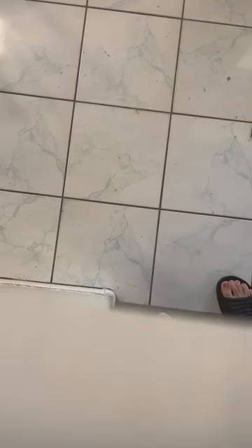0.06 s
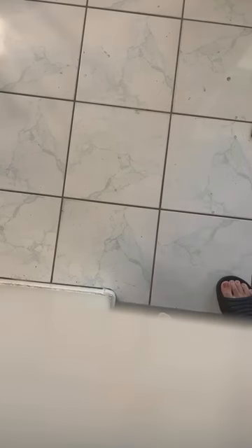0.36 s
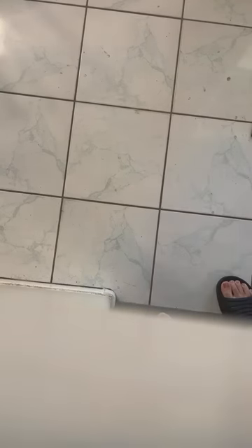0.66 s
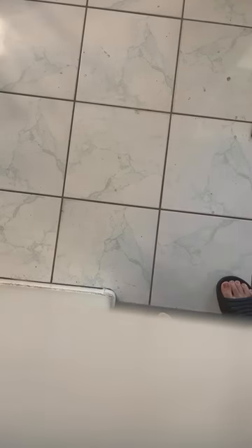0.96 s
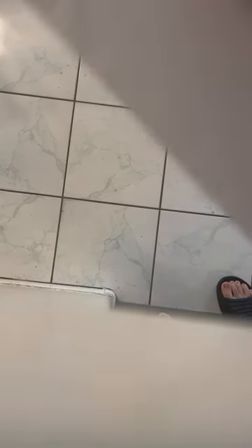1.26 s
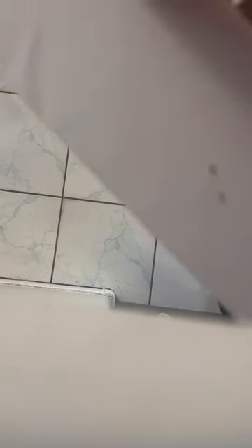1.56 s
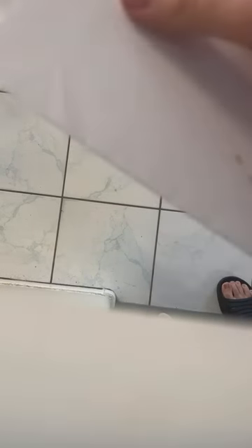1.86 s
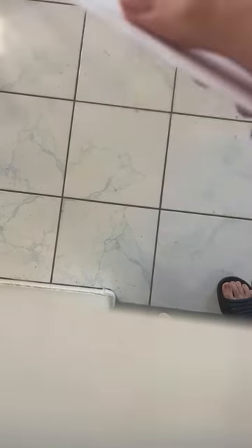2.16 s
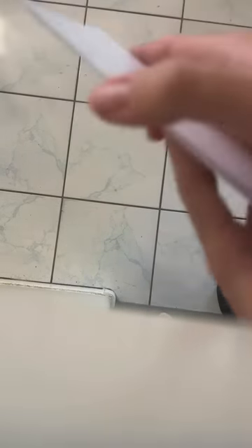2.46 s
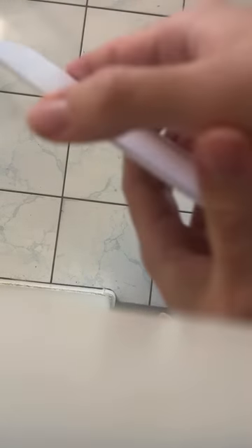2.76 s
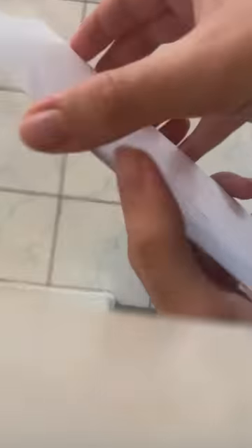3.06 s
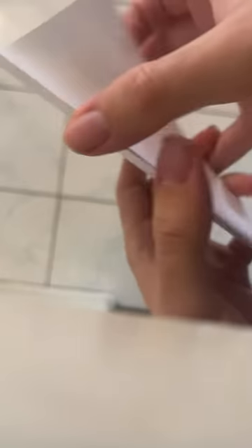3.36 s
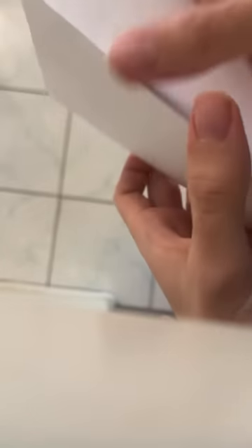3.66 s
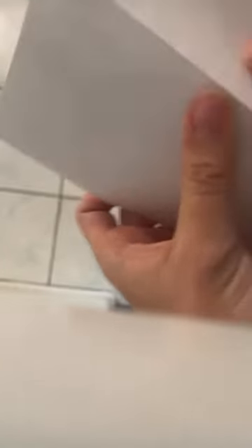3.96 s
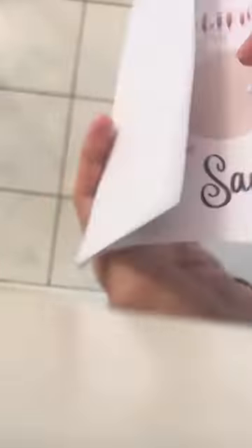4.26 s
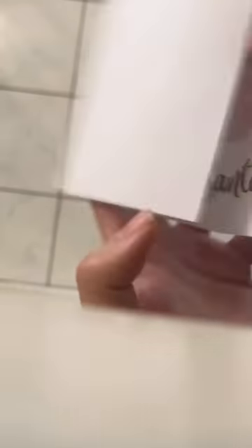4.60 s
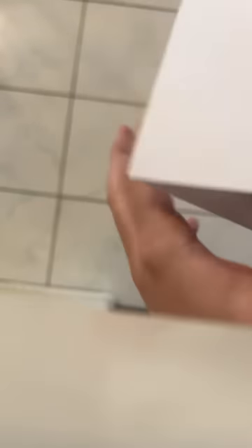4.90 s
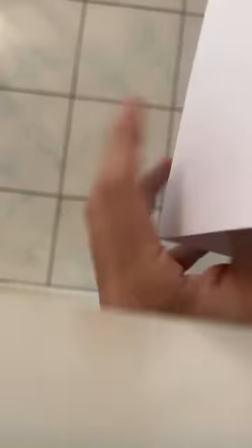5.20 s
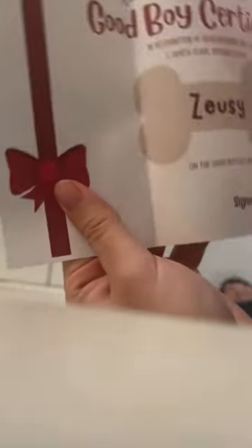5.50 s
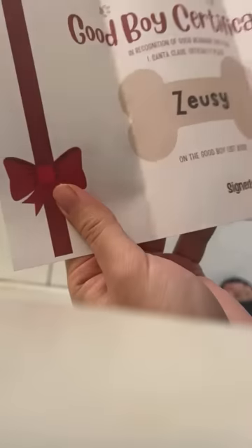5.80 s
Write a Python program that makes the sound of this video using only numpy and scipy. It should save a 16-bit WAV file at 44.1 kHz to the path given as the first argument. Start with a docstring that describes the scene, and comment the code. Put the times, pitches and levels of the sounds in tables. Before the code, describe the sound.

Hands slide a stiff sheet from a paper envelope and unfold it, with close rustles, snaps and flaps in a quiet room.

```python
"""A paper envelope is opened close up; hands slide a stiff folded sheet out and unfold it.
Fibres catch and let go as paper rubs on paper, giving a grainy hiss; an edge sticks and slips in a
faint, high squeak. Creases buckle in quick bursts of jolts, heard as snaps and flaps. Near the end one
flap knocks something hard that rings on briefly. The quiet tiled room adds a short tail and a low hum."""
import sys
import numpy as np
from scipy import signal
from scipy.fft import rfft, irfft
from scipy.io import wavfile
from scipy.ndimage import uniform_filter1d

SR = 44100
rng = np.random.default_rng(int(sys.argv[2]) if len(sys.argv) > 2 else 0)


def materialize(psi):
    """Save the field psi as 16-bit PCM at rate SR to the path in sys.argv[1].

    A 1-D psi becomes a single channel; in a 2-D psi each row is a channel.
    """
    bounded = np.clip(np.atleast_2d(psi).T, -1, 1)
    quanta = np.round(bounded * 32767).astype(np.int16)
    wavfile.write(sys.argv[1], SR, quanta)


N = 257533
TIME = np.arange(N) / SR

# a hand draws paper over paper: (time [s], length [s], level [dB], swell [dB], bass weight [dB],
# brightness [dB], note of the air pocket [Hz])
HAND_STROKES = [(0.0, 0.12, -27.5, -10.5, -7, -11.5, 1220), (0.133, 0.053, -38, 5.5, -11, -8.5, 1200),
                (0.237, 0.16, -38, -11.5, 1, -7, 1280), (0.546, 0.34, -57.5, -3.5, -1.5, 3.5, 1010),
                (0.954, 0.063, -52.5, -4, 12.5, 5.5, 1050), (1.034, 0.088, -46, -1.5, 4, 8, 1310),
                (1.16, .24, -45.5, -9, -4, 3, 1380), (1.45, 0.11, -57.5, 9.5, -11, -2.5, 1350),
                (1.704, 0.052, -56, -4.5, 10, 6, 1270), (1.825, 0.4, -75.5, -1, 15, 3, 1530),
                (2.15, 0.17, -66, 0, 0.5, 4, 1750), (2.454, 0.14, -57.5, 4, -7, -11.5, 1490),
                (2.724, 0.027, -55.5, 3.5, -8, -9.5, 1540), (2.79, 0.081, -58.5, 4.5, -2, -16.5, 1470),
                (2.978, 0.056, -55, -5.5, 6, -12.5, 1440), (3.163, 0.071, -65, 2, -11, -12, 1900),
                (3.33, 0.18, -58, 8.5, 3.5, -10.5, 1670), (3.508, 0.26, -51.5, -4, -9, -8, 1120),
                (3.706, 0.047, -35.5, 1, -23, -18.5, 1170), (3.943, 0.15, -40.5, -8.5, -2.5, -12.5, 1430),
                (4.154, .04, -39, -4, -2, -5, 1380), (4.282, .1, -52.5, 8, 9.5, -8.5, 1300),
                (4.504, 0.14, -47, 7.5, 3, -15, 1070), (4.7, 0.077, -35.5, -5, -1, -19, 1070),
                (4.85, 0.31, -54, -5, 5, -12.5, 960), (5.067, 0.15, -50.5, 0, -7, -11, 1180),
                (5.285, 0.026, -44.5, 3, -2, -12.5, 1110), (5.393, 0.09, -27.5, -15.5, 2, -25, 1100),
                (5.55, 0.19, -52.5, 4, -8, -13, 1240), (5.781, 0.021, -43.5, 2, -9, -18, 1240)]
# layers of the rub, named flutter, body, scrape and fibre hiss: (low edge [Hz], high edge [Hz])
RUB_BANDS = [(60, 500), (500, 2100), (2100, 7500), (7500, 16000)]
# mix of each rub layer: (offset [dB], share of bass weight [ratio], share of brightness [ratio])
RUB_MIX = [(-1, 1, 0.017), (0, 0.14, 0.066), (-1.5, 0, 0.53), (0, 0.079, 0.96)]
# sliding paper as coloured by the microphone, before each layer is levelled: (frequency [Hz], level [dB])
RUB_AT_MIC = [(50, 0.5), (150, 6.5), (300, 1.5), (700, -1), (1500, -2.5), (2400, -5), (3800, -4.5),
              (6000, -8.5), (7700, -20), (8600, -17.5), (9800, -17), (10900, -23.5), (13500, -19),
              (16000, -24)]
# faint rub of paper that is merely held, one value a rub layer: (level [dB])
HELD_RUB_DB = (-60, -71.5, -74, -87)
# a light touch lets the paper ring high and freely, a firm one lowers and damps it:
# (rub level [dB], note of the rubbed edge [Hz], ring [dB])
TOUCH_TONE = [(-72, 5400, 9), (-52, 4770, 6.5), (-47, 3480, 5.5), (-31.5, 2660, 5.5)]
# the sheet is held tight as it is drawn along, and again as it comes free:
# (time [s], narrow hiss against the fibre hiss [dB])
PINCH_CURVE = [(0, -14), (1.0, -12), (1.04, 3.5), (1.3, 3.5), (1.46, -2), (1.7, -14), (4.05, -15),
               (4.18, 1), (4.32, -19)]
# the paper buckles: (time [s], decay [s], panel note [Hz], crease note [Hz], level [dB],
# bass weight [dB], brightness [dB])
BUCKLES = [(0.001, 0.014, 106, 4500, -33.5, 4, -3), (0.0353, 0.0012, 1320, 8800, -31, -14, -10.5),
           (0.187, 0.008, 1280, 2660, -31, -10, -12), (0.196, .013, 900, 2720, -26, -9, -14.5),
           (0.211, 0.0071, 920, 2520, -23, -11, -25), (0.231, 0.0092, 586, 2900, -28.5, -10, -32),
           (0.284, .005, 1590, 3100, -36.5, -15, -23), (0.6234, 0.0082, 950, 5960, -52.5, 0, 1),
           (0.949, 0.0086, 1100, 4500, -53.5, -7, -2), (0.9771, 0.0043, 1080, 2450, -25, -25, -12),
           (1.0308, 0.0049, 1380, 5900, -30.5, -22, -5), (1.068, 0.0082, 250, 5000, -43.5, 4, -17),
           (1.5453, 0.011, 1440, 4470, -50, -12, 0.5), (1.587, 0.006, 446, 2670, -35, -9, -13.5),
           (2.9, 0.01, 1460, 5000, -49, -22, -15), (3.014, 0.0088, 1500, 6900, -63, -11, 2),
           (3.3488, 0.004, 1460, 5800, -52.5, 5, -21), (3.399, 0.0054, 2070, 2770, -45, -20, -12),
           (3.4581, 0.0038, 1080, 4260, -29, -51, -8), (3.458, 0.0054, 100, 4300, -65, 30.5, -3),
           (3.506, .0028, 1100, 4500, -46, -13, -8.5), (3.646, 0.0038, 930, 5300, -44.5, 0, -20),
           (3.6842, 0.0027, 1170, 5240, -20, -10.5, -8), (3.6886, 0.0088, 1840, 2760, -17.5, -11.5, -20.5),
           (3.7643, 0.0072, 270, 2820, -36, 0, -6), (3.8046, 0.011, 252, 4800, -38, 4, -5.5),
           (3.822, 0.021, 120, 4770, -33, -1.5, -9.5), (3.917, .002, 1400, 5200, -50, 0, -1),
           (3.937, .012, 272, 2500, -37, 6, -21), (4.0239, 0.012, 141, 3040, -36.5, 13.5, -38),
           (4.132, 0.0021, 1690, 2780, -16, -32, -25.5), (4.321, 0.0196, 131, 3000, -53.5, 17, -13),
           (4.3463, 0.0023, 1200, 5600, -29.5, -6, -9.5), (4.423, 0.015, 156, 2500, -37, 13, -14),
           (4.446, 0.0019, 1580, 2820, -36, 6, -15), (4.4516, 0.0074, 410, 3060, -17.5, -12, -46),
           (4.578, 0.017, 1050, 2800, -28.5, -1.5, -19.5), (4.611, 0.014, 1730, 3480, -30, -10, -9.5),
           (4.676, 0.0075, 300, 2720, -36.5, -1, -14), (4.682, 0.0093, 1020, 2780, -24, -0.5, -12),
           (4.7026, 0.01, 276, 2380, -28.5, -2, -15), (4.943, .0032, 213, 2800, -50, -1, -9),
           (4.98, 0.014, 148, 2780, -45, 18, -43), (5.1404, 0.009, 216, 4770, -45.5, 4, -7.5),
           (5.284, 0.017, 884, 8800, -47, -1, -21), (5.322, 0.016, 125, 3200, -52, 18.5, -10),
           (5.3664, 0.0056, 1080, 2630, -23.5, -17, -31), (5.3703, 0.011, 1040, 2700, -20, -12, -31.5),
           (5.4257, 0.0061, 840, 3000, -35.5, -3, -13.5), (5.658, 0.032, 180, 5640, -48, 5, -11.5),
           (5.806, 0.0071, 920, 2560, -24.5, -5, -30), (5.8136, 0.0016, 960, 2320, -15.5, -13, -32),
           (5.8166, 0.014, 330, 2530, -19.5, -4, -26)]
# layers of a snap, named thump, flap, pop, crack, snap and tick: (low edge [Hz], high edge [Hz])
SNAP_LAYERS = [(60, 250), (250, 800), (800, 2150), (2150, 3700), (3700, 7000), (7000, 16000)]
# mix of each snap layer: (offset [dB], share of bass weight [ratio], share of brightness [ratio],
# lift with the panel note [dB/octave], lift with the crease note [dB/octave])
SNAP_MIX = [(-1, 1, 0.055, 0, 0), (1.5, .3, 0, -0.95, -0.5), (0.5, 0.011, 0.027, 0, 0.5),
            (-5, 0.018, 0.38, 0, -2.5), (-0.5, 0, 0.91, 0.5, 1), (-0.5, 0.054, 1.37, 1, -1.5)]
# a snap as coloured by the microphone, before each layer is levelled: (frequency [Hz], level [dB])
SNAP_AT_MIC = [(50, -6), (110, 5.5), (400, -5.5), (700, -3.5), (1150, 3), (2000, -4), (2350, -11.5),
               (3600, -14.5), (5300, -18.5), (7300, -24), (9300, -23), (11000, -31), (15500, -35.5)]
# standing resonances of envelope and sheet: (frequency [Hz], sharpness [Q], lift [dB])
PAPER_RESONANCES = [(286.5, 7.9, 2), (1710, 10.4, 1.5), (2130, 72, -1), (3150, 52, 1.5), (4360, 47, -1.5),
                    (5165, 22, 0.5), (8420, 41, 3), (9600, 23, 0.5)]
# tail of the tiled room: (low edge [Hz], high edge [Hz], time to fall 60 dB [s], level [dB])
REVERB_BANDS = [(132, 217, 0.97, -15.5), (202, 540, 0.31, -35), (600, 1600, 1, -17),
                (2620, 5900, 0.67, -11), (7140, 16000, 0.49, -16.5)]
# colour of the room tone: (frequency [Hz], level [dB])
HUM_COLOUR = [(30, -25.5), (55, -17.5), (80, 1.5), (115, -9), (190, 4.5), (290, -9), (390, -8.5),
              (650, -21), (1000, -21), (1600, -30.5), (2700, -36.5), (5500, -38.5), (11000, -46),
              (16000, -64)]
# two spots of a paper edge squeak: (time [s], upper pitch [Hz], lower pitch [Hz])
SQUEAK_PITCHES = [(3.345, 12000, 11600), (3.385, 14100, 13500), (3.43, 15150, 14650), (3.495, 14100, 13600),
                  (3.545, 13700, 13000), (3.643, 14700, 12850), (3.69, 14300, 12550)]
# modes of the hard thing that is knocked: (frequency [Hz], level [dB], time to fall 60 dB [s])
KNOCK_RING = [(197, -32, 0.25), (375, -24.5, 0.11), (863, -15.5, 0.15), (858, -39.5, 0.75),
              (910, -51, 0.38), (958, -62, .45), (1070, -50, 0.22), (1523, -41, .35)]

STROKE_RISE_S, STROKE_RISE_SHARE, STROKE_RELEASE_DB_PER_S = 0.014, 0.27, 230
GRIP_CHANGE_S, PINCH_LOW_HZ, PINCH_HIGH_HZ = 0.064, 8250, 9870
MID_PANEL_HZ, MID_CREASE_HZ = 800, 3300
# the sheet rubs as it settles: offsets from its snap, and shares of the snap's colour that it keeps
SETTLE_DB, SETTLE_WEIGHT_DB, SETTLE_BRIGHT_DB = -15, 2.5, -8
SETTLE_KEEPS_WEIGHT, SETTLE_KEEPS_BRIGHT = 0.24, 0.73
SETTLE_RISE_S, SETTLE_DB_PER_S = 0.0092, 110
BEND_DB, BEND_DB_PER_S = -2.5, 900   # the same rub swells just before the sheet gives way


def from_db(db):
    return 10 ** (np.asarray(db) / 20)


def rms_one(x):
    return x / np.sqrt(np.mean(x ** 2) + 1e-20)


def in_time(rows):
    """One curve for each column after the time."""
    times, *columns = np.transpose(rows)
    return [np.interp(TIME, times, column) for column in columns]


def band(x, low, high, order=3):
    sos = signal.butter(order, [low, min(high, .45 * SR)], "band", fs=SR, output="sos")
    return signal.sosfilt(sos, x + 1e-18)


def drift(turns_per_s):
    """Random wander with an RMS of 1."""
    knots = rng.standard_normal(int(N / SR * turns_per_s) + 2)
    return rms_one(np.interp(TIME * turns_per_s, np.arange(len(knots)), knots))


def response(colour, size=4096):
    """Minimum-phase impulse response with the given colour."""
    hz, db = np.transpose(colour)
    grid = np.maximum(np.arange(size // 2 + 1) * SR / size, 1)
    gain = from_db(np.interp(np.log(grid), np.log(hz), db))
    cepstrum = irfft(np.log(gain))
    fold = np.r_[1, np.full(size // 2 - 1, 2), 1, np.zeros(size // 2 - 1)]
    return irfft(np.exp(rfft(cepstrum * fold)))


def through(x, impulse):
    return signal.fftconvolve(x, impulse)[:len(x)]


def add(track, start_s, sound):
    start = int(np.clip(round(start_s * SR), 0, N - 1))
    track[start:start + len(sound)] += sound[:N - start]


def resonate(x, hz, q, boost_db):
    """Bell EQ: lifts or dips a band around hz."""
    b, a = signal.iirpeak(hz, q, fs=SR)
    return x + (from_db(boost_db) - 1) * signal.lfilter(b, a, x)


def glide(x, hz, q, boost_db, block=256):
    """Bell EQ with a moving centre."""
    peak, state = np.zeros(N), np.zeros(2)
    for i in range(0, N, block):
        b, a = signal.iirpeak(hz[i], q, fs=SR)
        peak[i:i + block], state = signal.lfilter(b, a, x[i:i + block], zi=state)
    return x + (from_db(boost_db) - 1) * peak


def envelope(start, rise, hold, swell_db, release_db_per_s, time):
    """Rises, swells or sags while it is held, then dies away."""
    age = time - start
    held_db = swell_db * np.clip(age / hold, 0, 1)
    release_db = release_db_per_s * np.maximum(age - hold, 0)
    return np.clip(age / rise, 0, 1) * from_db(held_db - release_db)


def layer_levels(mix, db, *traits):
    """Level of each layer in dB: weight lifts the lows, brightness the highs."""
    return db + np.array(mix) @ [1, *traits]


def rub_gains(step=64):
    """Friction strength per layer: the held sheet, the strokes, bending and settling around each snap."""
    time = TIME[::step]
    power = from_db(HELD_RUB_DB)[:, None] ** 2
    for start, length, db, swell_db, weight_db, bright_db, _ in HAND_STROKES:
        rise = STROKE_RISE_S + STROKE_RISE_SHARE * length   # a long stroke starts more gently
        lead = rise / 2
        shape = envelope(start - lead, rise, length + lead, swell_db, STROKE_RELEASE_DB_PER_S, time)
        levels = layer_levels(RUB_MIX, db, weight_db, bright_db)
        power = power + np.outer(from_db(levels), shape) ** 2
    for start, *_, db, weight_db, bright_db in BUCKLES:
        bending = (time < start) * from_db(BEND_DB - BEND_DB_PER_S * np.abs(start - time))
        settling = envelope(start, SETTLE_RISE_S, SETTLE_RISE_S, 0, SETTLE_DB_PER_S, time)
        rub_weight_db = SETTLE_WEIGHT_DB + SETTLE_KEEPS_WEIGHT * weight_db
        rub_bright_db = SETTLE_BRIGHT_DB + SETTLE_KEEPS_BRIGHT * bright_db
        levels = layer_levels(RUB_MIX, db + SETTLE_DB, rub_weight_db, rub_bright_db)
        power = power + np.outer(from_db(levels), bending + settling) ** 2
    return [np.interp(TIME, time, np.sqrt(layer)) for layer in power]


def friction(catches_per_s=900, catch_db=1.0, judder_db=1.5, crinkles_per_s=70, crinkle_db=-13.5):
    """Fibres catch and let go in uneven clumps over a smooth rub; now and then a tiny crease crinkles."""
    sizes = from_db(catch_db * np.minimum(rng.exponential(1, N), 5)) * rng.choice([-1, 1], N)
    catches = rms_one(sizes * (rng.random(N) < catches_per_s / SR))
    crinkles = rms_one(sizes * (rng.random(N) < crinkles_per_s / SR))
    rub = catches + rng.standard_normal(N)
    return rub * from_db(judder_db * drift(130)) + from_db(crinkle_db) * crinkles


def sliding(trim_db=-3.0, pressure_db=1.0):
    """Friction shakes the sheet and the air pocket under it; a pinch brings out a narrow hiss."""
    gains = rub_gains()
    pocket_hz, = in_time([(start + length / 2, hz) for start, length, *_, hz in HAND_STROKES])
    grip_db = uniform_filter1d(20 * np.log10(gains[1]), int(GRIP_CHANGE_S * SR))
    touch_db, *tone = np.transpose(TOUCH_TONE)
    edge_hz, ring_db = [np.interp(grip_db, touch_db, column) for column in tone]
    shake = through(friction(), response(RUB_AT_MIC))
    shake = glide(shake, pocket_hz, q=3.6, boost_db=ring_db)
    shake = glide(shake, edge_hz, q=26.0, boost_db=ring_db - 3.0)
    # the pocket cancels just above its note
    shake = glide(shake, 1.31 * pocket_hz, q=2.3, boost_db=-ring_db / 2)
    *body, hiss = [gain * rms_one(band(shake, *edges, order=4)) for gain, edges in zip(gains, RUB_BANDS)]
    pinch = from_db(in_time(PINCH_CURVE)[0])
    narrow = pinch * gains[-1] * rms_one(band(friction(), PINCH_LOW_HZ, PINCH_HIGH_HZ, order=4))
    top = (hiss + narrow) / np.sqrt(1 + pinch ** 2)   # equal-power blend
    pressure = from_db(trim_db + pressure_db * drift(22))   # a hand never presses evenly
    return pressure * (sum(body) + top)


def snaps(first_jolt=6.8, uneven_db=2.0, bass_lingers=0.16, bend_lag_s=0.00037, slack=0.093, size=6000):
    """A crease gives way with one jolt, then smaller ones as the bend runs through the sheet and dies."""
    out, age, miked_snap = np.zeros(N), np.arange(size) / SR, response(SNAP_AT_MIC)
    for start, decay, panel_hz, crease_hz, db, weight_db, bright_db in BUCKLES:
        jolts = rms_one(rng.standard_normal(size) * from_db(uneven_db * rng.standard_normal(size)))
        # the buckling panel rings with two short notes, the crease with a higher one
        body = resonate(miked_snap, panel_hz, q=4.7, boost_db=10.5)
        body = resonate(body, 1.685 * panel_hz, q=4.9, boost_db=9.0)
        body = resonate(body, crease_hz, q=16.0, boost_db=9.5)
        octaves = np.log2([panel_hz / MID_PANEL_HZ, crease_hz / MID_CREASE_HZ])
        levels = layer_levels(SNAP_MIX, db, weight_db, bright_db, *octaves)
        for (low, high), layer_db in zip(SNAP_LAYERS, levels):
            slowness = 1300 / np.sqrt(low * high)   # above 1 for layers centred below 1300 Hz
            push = jolts * np.exp(-age / (decay * slowness ** bass_lingers))
            push[0] = first_jolt * max(slowness ** 0.12, slowness ** -0.045)   # the heave and the tick
            layer = band(through(push, body), low, high, order=5 if low > 500 else 3)
            layer *= np.sqrt(0.01 * SR / np.sum(layer ** 2))   # the energy of 10 ms at unit RMS
            # bending waves are dispersive: low notes arrive later, the more so in a slack, slow flap
            lag = (bend_lag_s + slack * decay) * max(np.sqrt(slowness) - 1, 0)
            add(out, start + lag, from_db(layer_db) * layer)
    return out


def paper_body(x):
    """Snaps and rubs ring the paper's standing resonances; the overall level is kept."""
    level = np.std(x)
    for hz, q, db in PAPER_RESONANCES:
        x = resonate(x, hz, q, db)
    return x * level / np.std(x)


def tiled_reverb(x, first_echo_s=0.0019, build_s=0.0076, size=26000):
    """Dense reflections off the tiles build up and die away band by band."""
    age = np.arange(size) / SR
    onset = 1 - np.exp(-np.maximum(age - first_echo_s, 0) / build_s)
    tail = np.zeros(size)
    for low, high, t60, db in REVERB_BANDS:
        echoes = band(rng.standard_normal(size), low, high) * onset * from_db(-60 * age / t60)
        tail += from_db(db) * echoes * np.sqrt(2 * (high - low) / SR / np.sum(echoes ** 2))
    return through(x, tail)


def room_hum(noise_db=-52.5, drone_hz=175, drone_db=-60):
    """A steady bed of low room noise with a narrow drone in it."""
    noise = through(rng.standard_normal(N), response(HUM_COLOUR))
    bed = rms_one(band(noise, 56, 18000))
    drone = rms_one(band(rng.standard_normal(N), drone_hz - 10, drone_hz + 10, order=2))
    return from_db(noise_db) * bed + from_db(drone_db) * drone


def squeak(level_db=-68, swell_db=-3.5, waver=.008, lower_spot_db=-2.0):
    """Two spots of an edge stick and slip at slightly different, wavering rates."""
    start, end = SQUEAK_PITCHES[0][0], SQUEAK_PITCHES[-1][0]
    shape = envelope(start, STROKE_RISE_S, end - start, swell_db, STROKE_RELEASE_DB_PER_S, TIME)
    pitches = [hz * (1 + waver * drift(900)) for hz in in_time(SQUEAK_PITCHES)]
    upper, lower = [np.sin(2 * np.pi * np.cumsum(hz) / SR) for hz in pitches]
    return from_db(level_db) * shape * (upper + from_db(lower_spot_db) * lower)


def knock(start_s=5.368):
    """A flap strikes something hard, whose modes ring down each at its own pace."""
    age = np.maximum(TIME - start_s, 0)
    return sum(from_db(db - 60 * age / t60) * np.sin(2 * np.pi * hz * age) for hz, db, t60 in KNOCK_RING)


def scene():
    """Close paper and the knock, with their reverb, over the room's hum; mono."""
    close = paper_body(snaps() + sliding()) + squeak() + knock()
    return (close + tiled_reverb(close) + room_hum())[None]


def record(dry, ceiling=.95, cutoff_hz=16000):
    """A soft clip rounds the highest peaks and a steep low-pass trims the top."""
    rounded = dry / (1 + (dry / ceiling) ** 6) ** (1 / 6)
    return signal.sosfilt(signal.ellip(10, .1, 80, cutoff_hz, fs=SR, output="sos"), rounded)


dry = scene()
out = record(dry)
materialize(out)
```